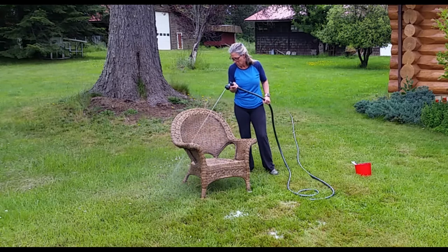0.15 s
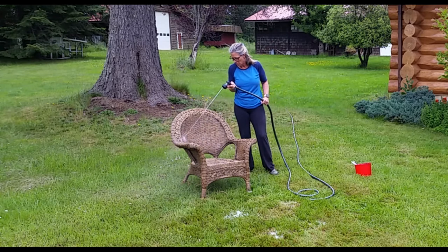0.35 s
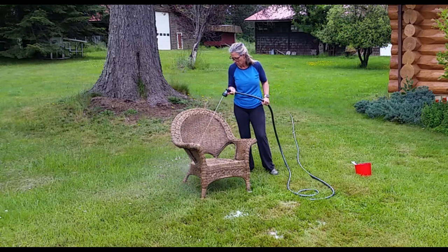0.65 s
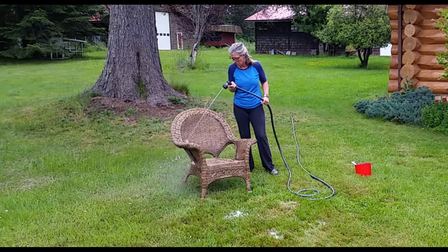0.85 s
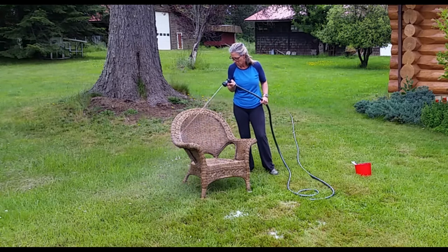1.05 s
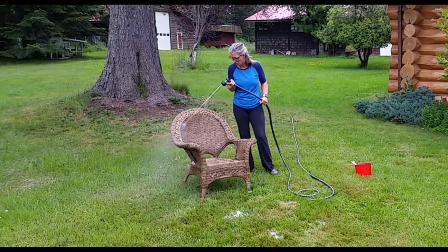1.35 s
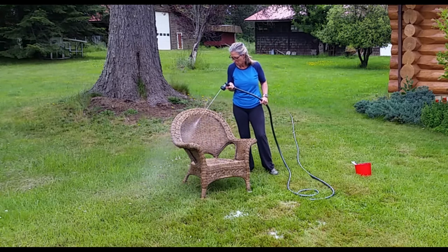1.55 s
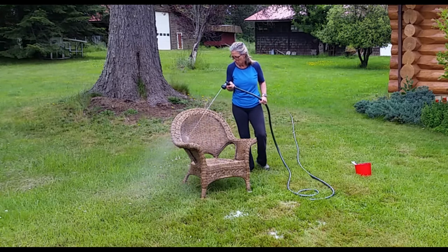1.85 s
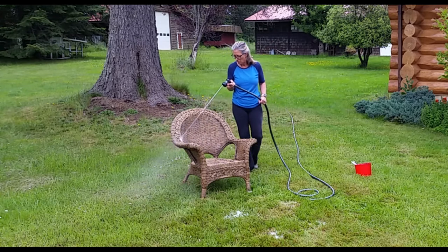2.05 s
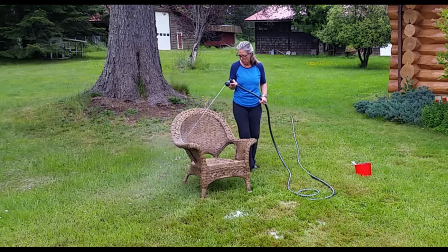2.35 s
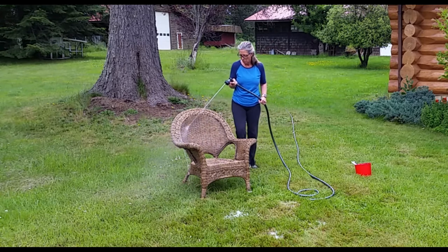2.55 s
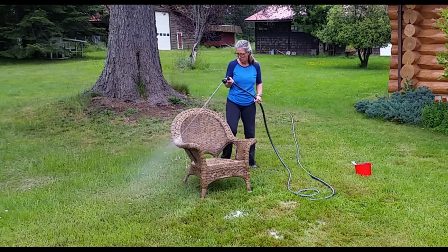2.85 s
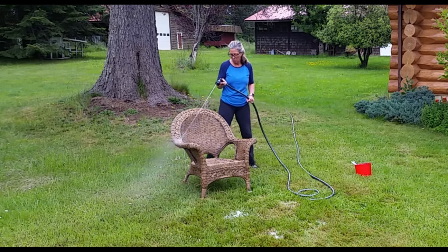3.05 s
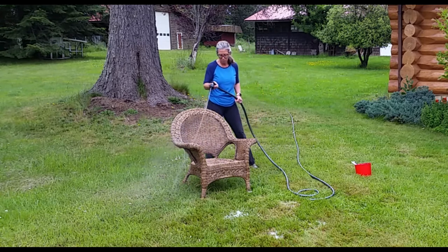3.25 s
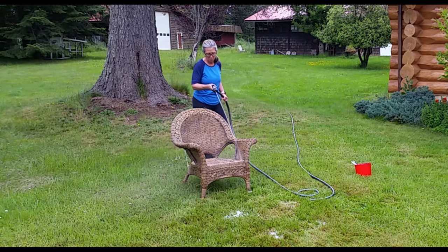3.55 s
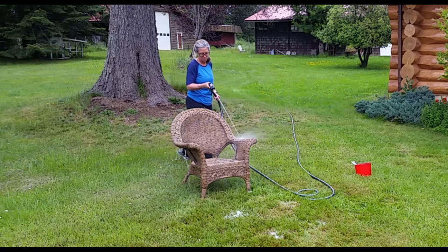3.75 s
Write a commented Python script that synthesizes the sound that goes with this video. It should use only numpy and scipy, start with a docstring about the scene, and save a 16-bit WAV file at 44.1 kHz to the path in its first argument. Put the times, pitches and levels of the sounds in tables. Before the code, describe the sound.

A garden hose jet sprays a wicker chair on a lawn, a bright hiss with pattering drops and soft hollow drumming, swelling and dipping until it stops abruptly; stereo microphone, faint low outdoor rumble.

```python
"""A garden hose plays a hissing jet over a wicker chair on a lawn, above a low outdoor rumble.
From the start, thousands of tiny drops a second tick on the cane as filtered random clicks over noise.
Heavier drops patter and slap in the weave and make it drum and ring, with short gushes at a patch's pitch.
The sound swells and sinks as the jet wanders on and off the chair; from 1.25 s a few fat drops snap.
Near the end, at about 3.9 s, everything stops short."""
import sys
import numpy as np
from scipy import signal
from scipy.fft import rfft, irfft
from scipy.io import wavfile
from scipy.ndimage import map_coordinates

SR = 44100
rng = np.random.default_rng(int(sys.argv[2]) if len(sys.argv) > 2 else 0)


def int16_out(signal):
    """Quantize to a 16-bit WAV file."""
    q = np.round(np.clip(np.atleast_2d(signal).T, -1, 1) * 32767)
    wavfile.write(sys.argv[1], SR, q.astype(np.int16))


N = 171990
T = np.arange(N) / SR   # time of every sample, in seconds

# how much later the sound reaches the right ear as the jet moves: start_s, lag_us (microseconds)
LAG = [(0, 95.5), (3.3, 100.7), (3.55, 55), (3.9, 46)]
# colour of the tiny ticks, before the level is set: pitch_hz, level_db
HISS = [(5000, -45.5), (8300, -24.5), (9300, -15.5), (10300, -5.5), (11300, 0.5), (12100, -1.5),
        (13000, -7), (14500, -12), (17000, -28)]


def from_db(db):
    """Turn decibels into a gain."""
    return 10 ** (np.asarray(db) / 20)


def rms_one(x):
    """Scale a sound to an average strength (rms) of one."""
    return x / np.sqrt(np.mean(x ** 2) + 1e-20)


def in_time(rows):
    """Draw straight lines between a table's times, giving each other column sample by sample."""
    s, *columns = np.transpose(rows)
    return [np.interp(T, s, column) for column in columns]


def drift(rate_hz):
    """Smoothed noise that wanders at random around zero, with a spread of about one."""
    step = 40   # samples between the points of the wander
    r = np.exp(-2 * np.pi * rate_hz * step / SR)
    noise = rng.standard_normal(N // step + 2002)
    slow = signal.lfilter([1], [1, -2 * r, r * r], noise)[2000:]   # skip the filter's start
    return np.interp(np.arange(N) / step, np.arange(len(slow)), rms_one(slow))


def coloured(x, points, size=4096):
    """Filter to the given (Hz, dB) curve, with the response as early as possible (minimum phase)."""
    hz, db = np.transpose(points)
    grid_hz = np.maximum(np.arange(size // 2 + 1) * SR / size, 1)
    gain = from_db(np.interp(np.log(grid_hz), np.log(hz), db))
    cepstrum = irfft(np.log(gain))
    # folding the second half onto the first leaves nothing before time zero
    cepstrum[1:size // 2] *= 2
    cepstrum[size // 2 + 1:] = 0
    response = irfft(np.exp(rfft(cepstrum)))
    return signal.fftconvolve(x, response[None], axes=1)[:, :N]


def random_sizes(size_db, limit):
    """Drops of uneven strength: a random number of decibels, and a push or a pull."""
    return from_db(size_db * np.minimum(rng.exponential(1, N), limit)) * rng.choice([-1, 1], N)


def drops(per_s, size_db, lag_spread_us, mist_db):
    """Random impacts of uneven size, each from its own spot, over a smooth mist of noise."""
    born = np.flatnonzero(rng.random(N) < per_s / SR)
    sizes = random_sizes(size_db, limit=6)[born]
    lag_us = in_time(LAG)[0] + lag_spread_us * rng.standard_normal(N)
    late = np.round(lag_us[born] * SR / 1e6).astype(int)
    # the right ear hears each impact a little later than the left
    ticks = np.array([np.bincount(np.clip(at, 0, N - 1), sizes, N) for at in (born, born + late)])
    mist = from_db(mist_db) * rng.standard_normal((2, N))
    return rms_one(rms_one(ticks) + mist)


def layer(impacts, colour, level_db):
    """Give impacts a colour and a level."""
    return from_db(level_db) * rms_one(coloured(impacts, colour))


def reflected(x, delay_ms, wander_ms, echo_db):
    """Add one near reflection whose path length changes slowly."""
    delay_s = (delay_ms + wander_ms * drift(0.8)) / 1000
    at = (T - delay_s) * SR
    echo = np.array([map_coordinates(side, [at], order=2) for side in x])
    return rms_one(x + from_db(echo_db) * echo)


def shifting(x, patchy_db, width_hz, hold_s, size=512):
    """Narrow bands swell and fade at random as the jet crosses the uneven weave."""
    bands = signal.stft(x, nperseg=size)[2]
    field = rng.standard_normal(bands.shape[1:])
    # smooth the random field across pitch, then across time
    for axis, span in enumerate((width_hz * size / SR, hold_s * SR * 2 / size)):
        r = np.exp(-1 / span)
        field = signal.filtfilt([1 - r], [1, -r], field, axis=axis, padtype="even")
    gain = from_db(patchy_db * np.clip(rms_one(field), -2, 2))
    return rms_one(signal.istft(bands * gain, nperseg=size)[1][:, :N])


def clumps(clump_db, flutter_db):
    """The jet breaks up in quick clumps and slower flutter: a gain with an rms of one."""
    return rms_one(from_db(clump_db * drift(220) + flutter_db * drift(8.1)))


def fine_spray():
    """Tiny drops tick on the cane: a bright hiss, a sizzle above it and a softer splash below."""
    # how hard the spray strikes, before the trims below: start_s, hiss_db, sizzle_db, splash_db
    spray = [(0.0, -30.5, -34, -51), (0.05, -52, -53, -63), (0.07, -46.5, -51, -65),
             (0.11, -28.5, -43, -53), (0.15, -39.5, -37, -58), (0.2, -33, -43, -57),
             (0.26, -54.5, -53, -67), (0.29, -54, -50, -77), (0.33, -43.5, -43, -59.5),
             (0.4, -35.5, -43, -63.5), (0.45, -31.5, -40, -57.5), (0.54, -38, -45, -63.5),
             (0.56, -43, -47, -64.5), (0.66, -41.5, -42, -57), (0.7, -40, -43, -64), (0.8, -37, -42, -63),
             (0.93, -40.5, -46, -66), (0.97, -33.5, -41, -61.5), (1.03, -39, -45, -62),
             (1.34, -36, -40.5, -57), (1.67, -39.5, -42.5, -67.5), (1.85, -34.5, -41, -56),
             (1.92, -35.5, -41, -57.5), (2.03, -36.5, -48, -61.5), (2.06, -44, -47, -59.5),
             (2.17, -37, -42, -60.5), (2.22, -39.5, -48, -58), (2.32, -37.5, -43, -59),
             (2.4, -37, -46, -56), (2.45, -41.5, -47, -61), (2.53, -35.5, -40, -58),
             (2.67, -39, -43.5, -62.5), (2.9, -35, -43.5, -57.5), (3.2, -36.5, -44, -56.5),
             (3.34, -49.5, -48, -62), (3.38, -34, -49, -61), (3.42, -39.5, -50, -61), (3.45, -42, -51, -65),
             (3.49, -38.5, -39.5, -59.5), (3.79, -39, -42, -54.5), (3.84, -35.5, -41, -56),
             (3.87, -41, -44, -59)]
    # colours, before the level is set: pitch_hz, level_db
    sizzle_colour = [(9000, -24.5), (11500, -22), (13000, 5.5), (14500, 1), (16000, 6)]
    splash_colour = [(2000, -38), (3500, -7), (4500, -3.5), (6200, -1.5), (8000, -7.5), (10000, -2.5),
                     (14000, -41)]
    hiss_trim_db, sizzle_trim_db, splash_trim_db = 2, 8, 4.5
    # the curved back of the chair reflects the ticks and splashes
    chair_back = dict(delay_ms=2.2, wander_ms=0.222, echo_db=-13.5)
    uneven = dict(patchy_db=1.68, width_hz=290, hold_s=0.0098)

    hiss_db, sizzle_db, splash_db = in_time(spray)
    ticks = drops(per_s=11000, size_db=3.5, lag_spread_us=8, mist_db=-8)
    ticks = ticks * clumps(clump_db=0.1, flutter_db=0.64)
    ticks = shifting(reflected(ticks, **chair_back), **uneven)
    specks = drops(per_s=20000, size_db=2.0, lag_spread_us=8.6, mist_db=-16)
    specks = shifting(specks, **uneven)
    splashes = drops(per_s=9000, size_db=3.0, lag_spread_us=25, mist_db=-5.0)
    splashes = shifting(reflected(splashes, **chair_back), **uneven)

    hiss = layer(ticks, HISS, hiss_db + hiss_trim_db)
    sizzle = layer(specks, sizzle_colour, sizzle_db + sizzle_trim_db)
    splash = layer(splashes, splash_colour, splash_db + splash_trim_db)
    return hiss + sizzle + splash + snaps()


def wicker():
    """Heavier drops patter and slap in the weave in clumps and set it drumming and ringing."""
    # how hard the core of the jet strikes, before the trims below: start_s, drum_db, patter_db
    core = [(0.0, -52.5, -50.5), (0.06, -66.5, -59.5), (0.11, -53.5, -49.5), (0.14, -50.5, -55.5),
            (0.2, -54, -50.5), (0.25, -72, -59), (0.31, -65, -58.5), (0.33, -51.5, -55.5), (0.42, -56, -58),
            (0.56, -58, -57), (0.58, -48, -59), (0.61, -60.5, -54), (0.88, -55, -58), (0.92, -63.5, -56),
            (0.97, -56.5, -55.5), (1.25, -57, -55.5), (1.45, -64.5, -56), (1.68, -65.5, -58),
            (1.9, -58.5, -56), (2.15, -53.5, -57), (2.23, -57.5, -55.5), (2.39, -55, -53),
            (2.46, -56.5, -56), (2.72, -60, -57), (2.76, -52, -55.5), (2.84, -59, -57), (2.9, -54.5, -54),
            (2.99, -61, -55.5), (3.11, -55.5, -54.5), (3.18, -56.5, -54), (3.28, -56, -52.5),
            (3.34, -73, -57), (3.38, -53, -52.5), (3.42, -59.5, -57), (3.52, -64, -53.5),
            (3.66, -65.5, -55.5), (3.76, -53.5, -55), (3.87, -59.5, -56)]
    # colours, before the level is set: pitch_hz, level_db
    patter_colour = [(900, -23), (1300, -11), (1700, -8.5), (2400, 0.5), (3100, 2.5), (3900, -4),
                     (5000, -22), (9000, -33)]
    slap_colour = [(800, -22.5), (1200, -3), (1700, -5.5), (2100, -3), (3000, -21.5), (5000, -38)]
    drum_colour = [(50, -51.5), (220, -7.5), (400, -3.5), (600, -0.5), (800, 1.5), (1050, -0.5), (1400, -7),
                   (2200, -28.5), (5000, -43)]
    patter_trim_db, drum_trim_db, ringing_trim_db = 0.5, -1, -8
    # the wet slap: level at the mean force, then dB per dB of drumming and of patter
    slap_mean_db, slap_per_drum, slap_per_patter = -59.5, 0.3, 1.23
    # the lawn reflects the chair's sound
    lawn = dict(delay_ms=1.162, wander_ms=0.087, echo_db=-11)
    uneven = dict(patchy_db=2.5, width_hz=24, hold_s=0.028)

    drum_db, patter_db = in_time(core)
    light = drops(per_s=3200, size_db=1.5, lag_spread_us=49, mist_db=-1)
    wet = drops(per_s=2500, size_db=2.5, lag_spread_us=47, mist_db=-6)
    heavy = drops(per_s=2000, size_db=0.0, lag_spread_us=29, mist_db=-9.5)
    light, wet, heavy = (shifting(reflected(x, **lawn), **uneven) for x in (light, wet, heavy))

    # the slap comes in steeply when the jet hits squarely
    slap_db = slap_mean_db + slap_per_drum * (drum_db - drum_db.mean())
    slap_db = slap_db + slap_per_patter * (patter_db - patter_db.mean())
    patter = layer(light, patter_colour, patter_db + patter_trim_db)
    slap = layer(wet, slap_colour, slap_db)
    drumming = layer(heavy, drum_colour, drum_db + drum_trim_db)
    ringing = strands(per_s=1500, size_db=3.5) * from_db((drum_db + patter_db) / 2 + ringing_trim_db)
    weave = patter + slap + drumming + gushes()
    return weave * clumps(clump_db=0.4, flutter_db=0.82) + ringing


def strands(per_s, size_db, count=24):
    """Drops make wet strands of cane ring briefly, different ones as the jet moves over them."""
    low_hz, high_hz = 587, 3880   # before the pitches slide
    cycles = 25                   # a ring falls by 60 dB in this many cycles
    patchy_db = 5                 # most that a strand is struck harder or softer
    slide_s = 0.003003            # stretches and squeezes time, so pitches slide a few per cent

    hits = (rng.random(N) < per_s / SR) * random_sizes(size_db, limit=5)
    dealt = rng.integers(0, count, N)   # which strand each drop strikes
    out = np.zeros((2, N))
    for k, hz in enumerate(np.geomspace(low_hz, high_hz, count)):
        r = from_db(-60 * hz / (cycles * SR))   # decay per sample
        w = 2 * np.pi * hz / SR
        struck = hits * (dealt == k) * from_db(patchy_db * np.tanh(drift(7.1)))
        ring = signal.lfilter([0, np.sin(w)], [1, -2 * r * np.cos(w), r * r], struck + 1e-18)
        # the left side hears each strand 1 to 7 samples later
        out += [np.roll(ring, rng.integers(1, 8)), ring]
    slid = (T + slide_s * drift(1.996)) * SR
    return rms_one(np.array([map_coordinates(side, [slid], order=2, mode="mirror") for side in out]))


def outdoors():
    """Steady far rumble made of filtered noise, mostly alike in both ears."""
    # colour of the background, before the level is set: pitch_hz, level_db
    air_colour = [(20, 4.5), (40, -6), (80, 4.5), (130, 1), (170, -2), (215, 0.5), (300, -3.5), (500, -5.5),
                  (1500, -33), (6000, -23)]
    level_db, side_db = -59, -4.5   # side_db: the part that differs between the ears
    mid, side = rng.standard_normal((2, N))
    return layer(mid + from_db(side_db) * side * [[1], [-1]], air_colour, level_db)


def gushes():
    """The jet catches one patch of the chair squarely: a short burst of drops at that patch's pitch."""
    # bursts: middle_s, length_s (from the middle until it falls to 1/e), pitch_hz, level_db at its height
    bursts = [(0.11, 0.016, 1490, -55), (0.175, 0.027, 980, -51.5), (0.47, 0.024, 1370, -53.5),
              (0.495, 0.088, 214, -58), (0.655, 0.015, 2200, -53.5), (1.13, 0.02, 900, -52.5),
              (2.31, 0.018, 876, -55), (2.39, 0.02, 1680, -54), (2.49, 0.018, 210, -56),
              (3.135, 0.023, 830, -51), (3.22, 0.017, 2000, -53.5), (3.265, 0.01, 1700, -48),
              (3.386, 0.017, 1450, -50.5), (3.745, 0.021, 980, -48.5), (3.78, 0.058, 1760, -57),
              (3.8, 0.02, 900, -55)]
    width_octaves = 0.63
    hits = drops(per_s=2500, size_db=2.5, lag_spread_us=43, mist_db=-17)
    out = 0
    for middle_s, length_s, hz, db in bursts:
        edges_hz = hz * 2 ** (width_octaves * np.array([-0.5, 0.5]))
        band = signal.butter(2, edges_hz, "band", fs=SR, output="sos")
        swell = np.exp(-((T - middle_s) / length_s) ** 2)
        burst = rms_one(signal.sosfilt(band, hits) * swell)
        out = out + from_db(db) * np.sqrt(np.mean(swell ** 2)) * burst
    return out


def snaps():
    """The fattest drops stand out as single sharp ticks: lone clicks with the colour of the hiss."""
    # single fat drops, before the trim below and the colour: start_s, level_db
    fat_drops = [(1.2504, -6), (1.3624, -11), (1.789, -11), (2.0068, -11), (2.1267, -18), (2.5394, -8),
                 (3.1371, -8.5)]
    trim_db = 8
    s, db = np.transpose(fat_drops)
    at = (s * SR).astype(int)
    late = np.round(in_time(LAG)[0][at] * SR / 1e6).astype(int)
    clicks = np.array([np.bincount(i, from_db(db + trim_db), N) for i in (at, at + late)])
    return coloured(clicks, HISS)


def scene():
    """Spray, chair and background together, all dropping quickly by 30 dB at the stop."""
    stop_s, fade_s = 3.885, 0.0081   # the fade is a straight line towards silence, held at -30 dB
    stop_gain = np.clip(1 - (T - stop_s) / fade_s, from_db(-30), 1)
    return (fine_spray() + wicker() + outdoors()) * stop_gain


def record(dry):
    """The two sides of the microphone have their own colours, and the top treble is cut steeply."""
    # how the sides differ, half of it given to each: pitch_hz, left_minus_right_db
    side_colour = [(60, -0.7), (180, -1.2), (790, -2), (1140, -2.5), (1650, 1), (2380, 1.0), (3440, 0),
                   (4970, -6.5), (5900, -8), (7900, -4.5), (9200, 2.5), (11800, 4.5), (13000, 1)]
    cutoff_hz = 15770
    sides = []
    for k, sign in enumerate((1, -1)):
        colour = [(hz, sign * db / 2) for hz, db in side_colour]
        sides.append(coloured(dry[k:k + 1], colour)[0])
    low_pass = signal.firwin(1201, cutoff_hz, fs=SR, window=("kaiser", 8))
    return signal.fftconvolve(np.array(sides), low_pass[None], "same", axes=1)


dry = scene()
out = record(dry)
int16_out(out)
```